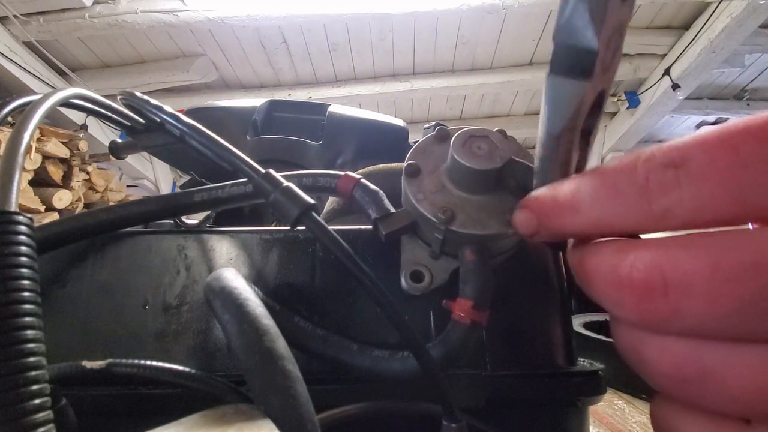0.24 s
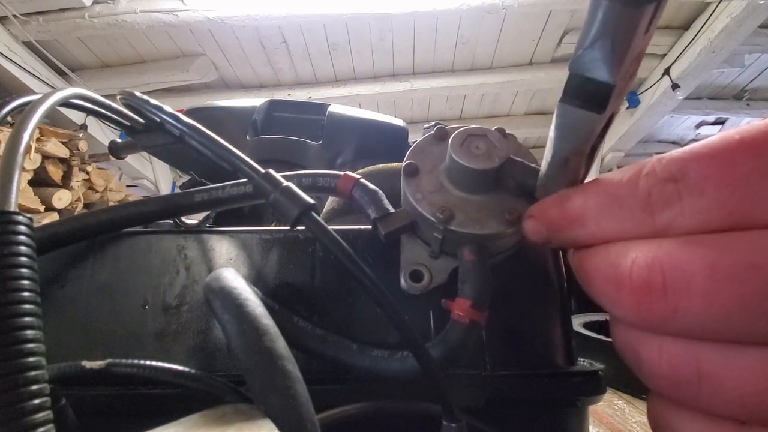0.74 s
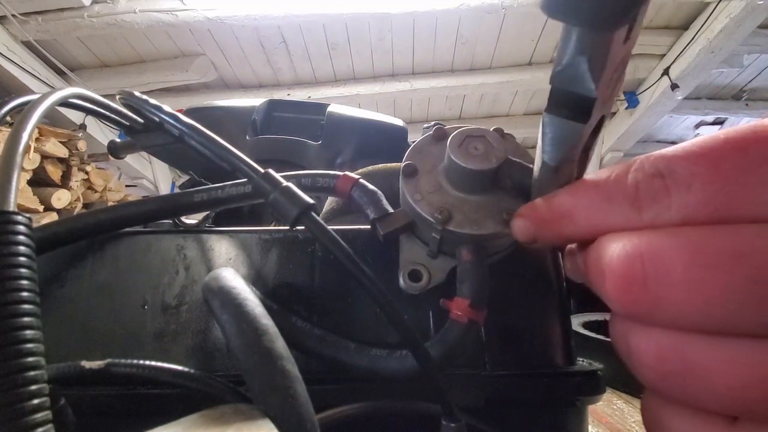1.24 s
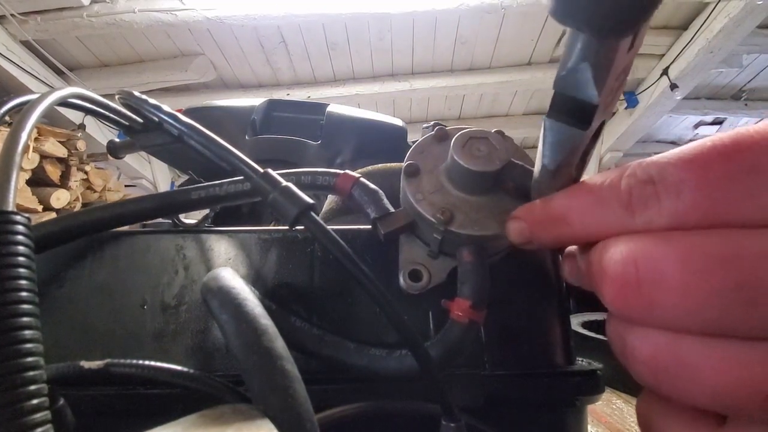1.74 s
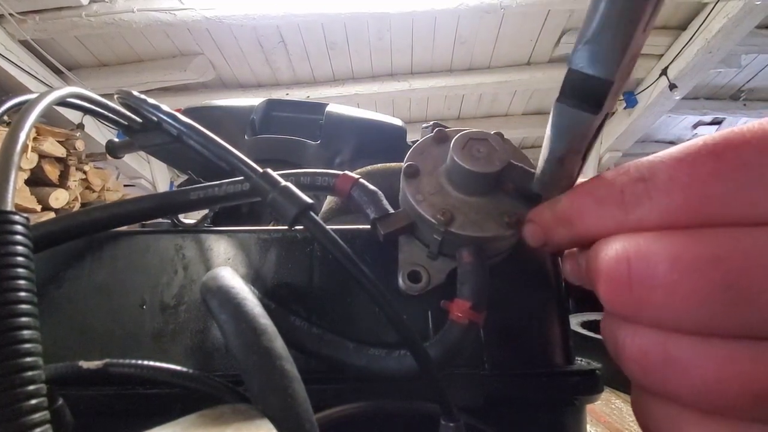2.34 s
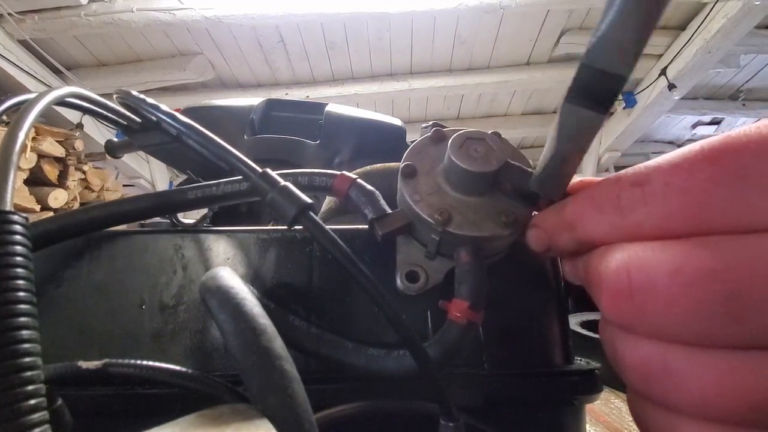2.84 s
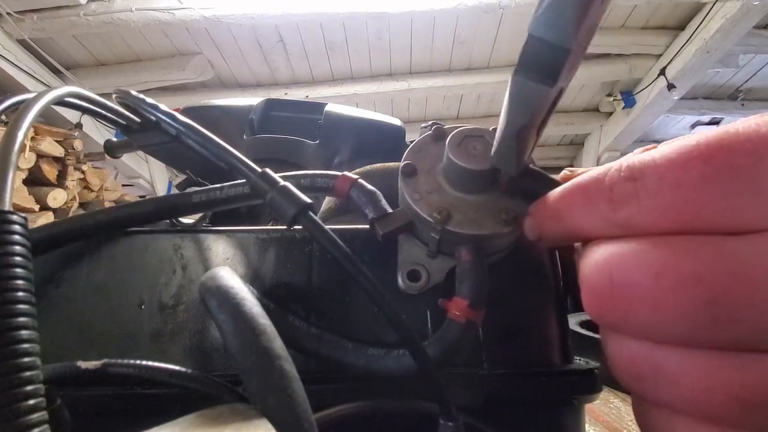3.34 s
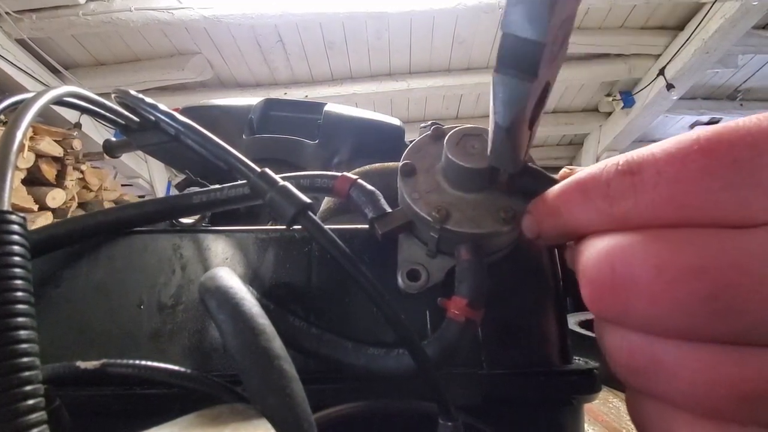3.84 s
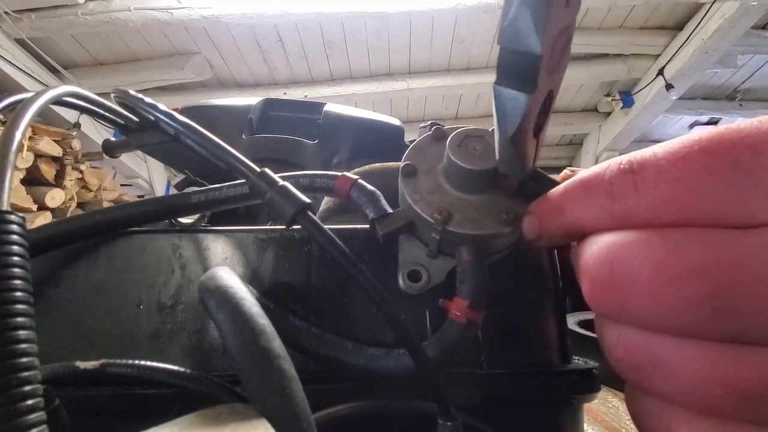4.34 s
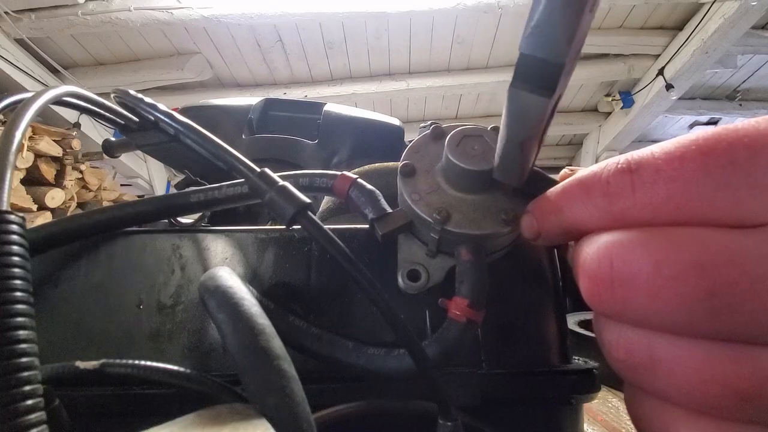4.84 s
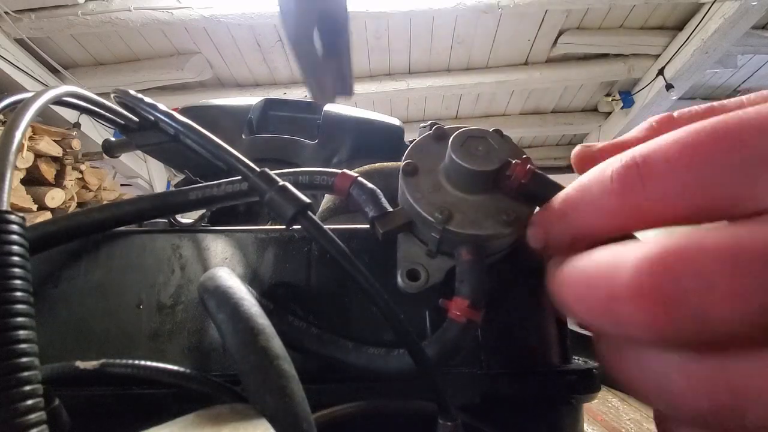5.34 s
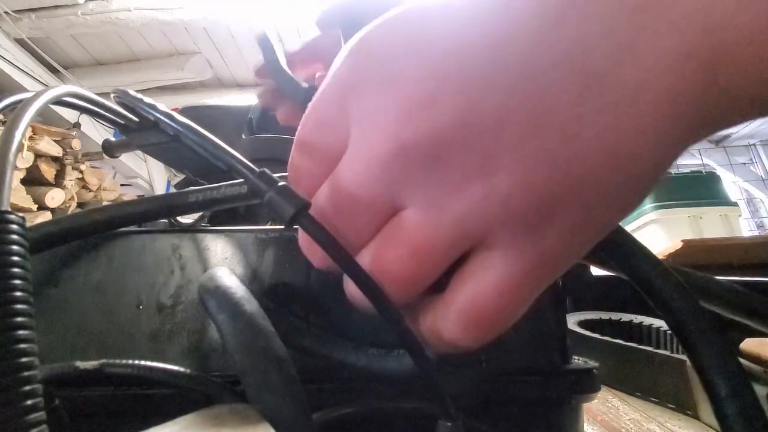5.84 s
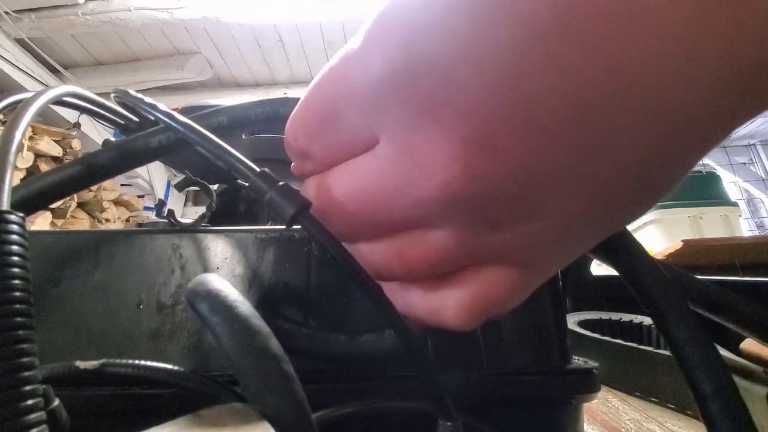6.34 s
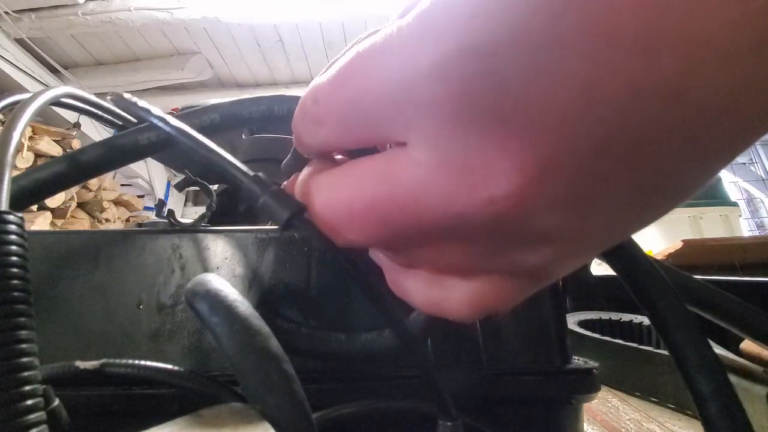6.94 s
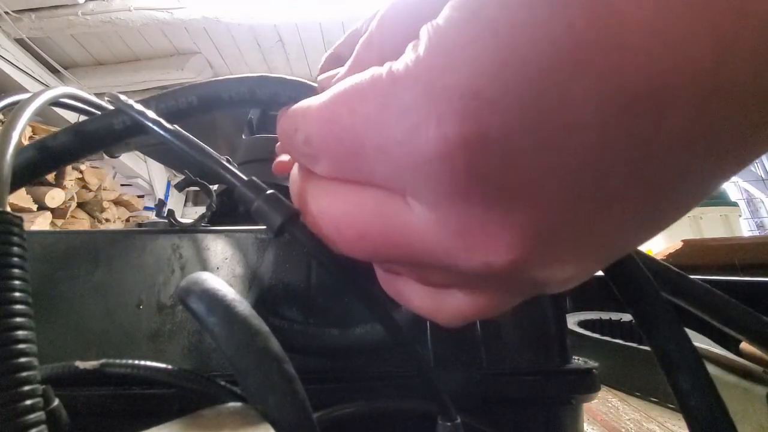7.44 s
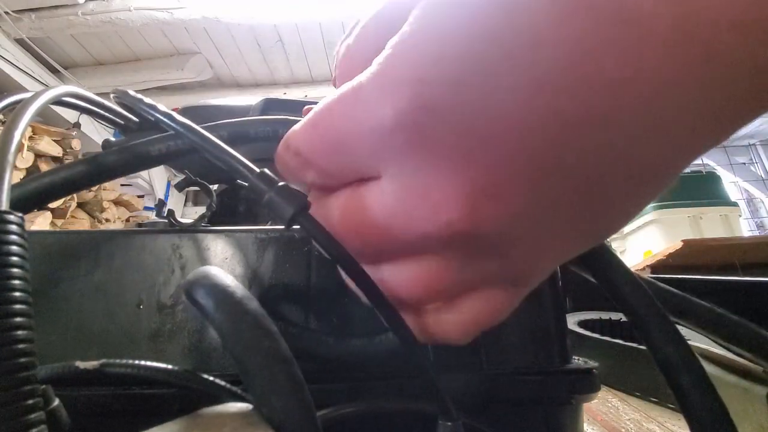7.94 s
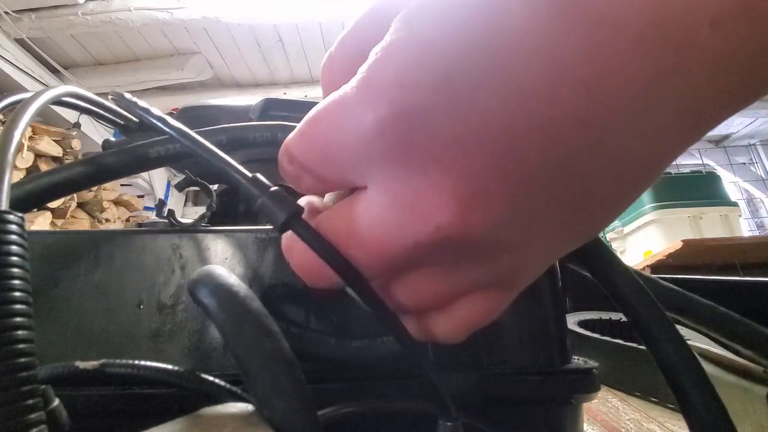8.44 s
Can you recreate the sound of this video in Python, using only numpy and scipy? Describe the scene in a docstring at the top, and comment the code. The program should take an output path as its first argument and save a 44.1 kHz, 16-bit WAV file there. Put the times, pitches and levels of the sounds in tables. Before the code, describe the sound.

Pliers tick, scrape and snap on a hose clamp, with irregular hollow knocks on a metal housing over a soft rumble.

```python
"""A wooden shed, stereo microphone close to a small pump: pliers work a spring clamp along its fuel hose.
Each slip knocks the sheet-metal housing, whose bending waves arrive treble first and then ring. The
steel jaws, a little to the left, tick, scrape, squeak and twice snap off the clamp. Hands rub the hose
and rock the machine, over a soft rumble and faint microphone hiss."""
import sys
import numpy as np
from scipy import signal
from scipy.fft import rfft, irfft, next_fast_len
from scipy.io import wavfile
from scipy.ndimage import uniform_filter1d

SR = 44100
rng = np.random.default_rng(int(sys.argv[2]) if len(sys.argv) > 2 else 0)


def bounce(signal):
    """Save signal as a 16-bit WAV file at the path given by the first command-line argument."""
    frames = np.transpose(np.atleast_2d(signal))
    limited = np.clip(frames, -1, 1)
    pcm = np.round(limited * 32767).astype(np.int16)
    wavfile.write(sys.argv[1], SR, pcm)


N = 383669
SIZE = 16384  # samples in one short sound
T = np.arange(SIZE) / SR
F = np.fft.rfftfreq(SIZE, 1 / SR) + 1  # Hz, kept clear of zero

# Modes of the sheet-metal housing. Each row: pitch in Hz, t60 in seconds, left and right level in dB.
HOUSING_MODES = [(56.01, 0.18, -7, -10.5), (95, 0.082, -5.5, -4), (135, 0.21, -0.5, 1),
                 (181, 0.087, 3.5, 4), (207, 0.055, 3.5, 8), (289, 0.12, 0.5, -3.5),
                 (345.4, 0.2, -3.5, -6.5), (375.4, 0.19, -7, -11.5), (434.7, 0.14, 2.5, -4.5),
                 (501, 0.16, -3.5, -25.5), (534, 0.15, -8.5, -2.5), (587, 0.23, -3, -4.5),
                 (643, 0.16, -5, -7), (705, 0.2, -12, -13), (815, 0.074, 6, -4.5), (926, 0.06, 0, -2.5),
                 (1096, 0.15, -3.5, -13.5), (1265, 0.032, 3, -13), (1345, 0.12, -9.5, -17.5),
                 (1543, 0.11, 0, -4.5)]


def undb(db):
    return 10 ** (np.asarray(db) / 20)


def rms(x):
    return np.sqrt(np.mean(x ** 2))


def add(out, start_s, sound):
    """Mix a sound in at its start time."""
    i = max(0, int(start_s * SR))
    out[..., i:i + sound.shape[-1]] += sound[..., :N - i]


def colour(x, outline):
    """Filter by an outline of (Hz, dB) points."""
    hz, db = np.transpose(outline)
    n = next_fast_len(x.shape[-1], True)
    f = np.fft.rfftfreq(n, 1 / SR) + 1
    gain = undb(np.interp(np.log(f), np.log(hz), db))
    return irfft(rfft(x, n) * gain, n)[..., :x.shape[-1]]


def delay(ms):
    """Spectrum of a plain delay."""
    return np.exp(-2j * np.pi * F * ms / 1000)


def mode_rings():
    """Spectrum of each housing mode ringing down on its own."""
    hz, t60 = np.transpose(HOUSING_MODES)[:2, :, None]
    return rfft(np.sin(2 * np.pi * hz * T) * np.exp(-np.log(1000) * T / t60)) * 1000 / SR


def housing(rings, hardness, wave_hz=590, width_octaves=.7, bend_hz=89, vary_db=3.25, detune=.025):
    """Stereo spectra of the struck sheet: a falling first wave, and the modes built by its reflections."""
    hz, _, left_db, right_db = np.transpose(HOUSING_MODES)
    spot_db = vary_db * rng.standard_normal(len(hz))  # no two blows land on quite the same spot
    weights = (-1) ** np.arange(len(hz)) * undb(np.array([left_db, right_db]) + spot_db)
    shift = np.exp(detune * rng.standard_normal())  # the hand's pressure shifts the modes a little
    ring = np.array([np.interp(F / shift, F, side) for side in weights @ rings])
    bend = np.exp(-2j * np.pi * 2.31 * np.log(1 + F / bend_hz))  # higher bending waves travel faster
    band = np.exp(-(np.log2(F / (wave_hz * hardness)) / width_octaves) ** 2)
    first_wave = undb([[20], [14]]) * band * bend
    arrival = np.array([delay(ms=0), delay(ms=0.4)])
    return first_wave * arrival, ring * delay(ms=3.86) * arrival


def knocks(usual_corner_hz=760, bass_hz=230, crack_s=0.0066, crack_right_db=-6):
    """A soft contact wakes only the low modes; a hard one lifts the first wave and adds a short crack."""
    # Blows on the housing. Each row: start in seconds, relative level in dB, contact corner in Hz,
    # then the gains of bass, first wave and crack in dB.
    blows = [(0.0, -26.5, 1130, -7, 2.5, -16), (0.439, -46, 487, 3, -3, -30), (.535, -50, 690, 6, 1.5, -33),
             (.734, -48, 840, -0.5, 0.5, -41), (0.85, -58.5, 507, 7, 5.5, -41),
             (0.985, -44, 800, 4, 2, -35), (1.1044, -42.5, 862, 6.5, 3.5, -42),
             (1.863, -36, 964, 0, 2, -34.5), (2.314, -38.5, 996, 1, -12.5, -7.5),
             (2.3491, -35.5, 1300, 3.5, 2, -9.5), (2.621, -56.5, 297, 0, 5, -27),
             (2.896, -58, 330, 3.5, -2.5, -46.5), (3.112, -64, 507, -14, -6, -44),
             (3.377, -45.5, 600, 5.5, -4, -35.5), (3.3979, -23.5, 1300, -0.5, 5, -10.5),
             (3.718, -51, 595, 9.5, -0.5, -35.5), (3.982, -65, 260, 1, -6, -45),
             (4.491, -44.5, 798, 4.5, -0.5, -37), (4.882, -41, 772.4, -4, -3, -21),
             (5.228, -23.5, 1137, -2, 3, -22.5), (5.584, -51, 130.3, -9, -3.5, -24.5),
             (5.906, -41.5, 781, 3.5, 2.5, -40), (5.97, -52, 666, 7, -1, -45.5),
             (7.116, -62, 1400, -12, -2, -14), (7.916, -29.5, 842, -2, -1, -18.5)]
    # Colour of the crack. Each row: frequency in Hz, gain in dB.
    crack_colour = [(400, -14), (1000, 5.5), (2000, -0.5), (3500, -8.5), (6500, -19.5), (8000, -26),
                    (15000, -23)]
    out, head = np.zeros((2, N)), int(.035 * SR)
    rings = mode_rings()
    fade = np.minimum(1, np.linspace(10, 0, SIZE))
    for start_s, db, corner_hz, bass_db, wave_db, crack_db in blows:
        first_wave, ring = housing(rings, hardness=(corner_hz / usual_corner_hz) ** 0.25)
        force = undb(bass_db / (1 + (F / bass_hz) ** 4)) / np.sqrt(1 + (F / corner_hz) ** 6)
        thud = irfft((undb(wave_db) * first_wave + ring) * force) * fade
        crack = colour(rng.standard_normal((2, SIZE)), crack_colour) * undb([[0], [crack_right_db]])
        crack *= np.exp(-T / crack_s) + 2 * np.exp(-T / 0.0013)
        knock = thud / rms(thud[:, :head]) + undb(crack_db) * crack / rms(crack[:, :head])
        add(out, start_s, undb(db + 1.5) * knock)
    return out


def shed(x, near_db, near_t60, far_db, far_t60, right_db):
    """Dense reflections from the machine itself, then a faint, duller tail from the boards."""
    near, far = rng.standard_normal((2, 2, SIZE))
    near = near * np.exp(-np.log(1000) * T / near_t60) * (1 - np.exp(-T / 0.00027))
    far = colour(far, [(100, 7), (900, -2), (2500, -6), (14000, -8)])
    far *= np.exp(-np.log(1000) * T / far_t60) * (1 - np.exp(-T / 0.013))
    echo = (undb(near_db) * near / rms(near) + undb(far_db) * far / rms(far)) / np.sqrt(SIZE)
    return x + signal.fftconvolve(x[:1], echo * undb([[0], [right_db]]), axes=1)[:, :N]


def rumble(outline, side_db=-12):
    """Deep noise of a given colour, nearly alike on both sides of the microphone."""
    mid, side = rng.standard_normal((2, N))
    deep = colour(mid + undb(side_db) * side * np.array([[1], [-1]]), outline)
    return deep / rms(deep)


def rocking():
    """The machine rocks under the hand: deep swells that rise and die away."""
    # A hand leans or bumps. Each row: start in seconds, level in dB, attack and decay in seconds.
    nudges = [(0.0, -49, .01, 0.076), (2.318, -39, 0.0063, .035), (2.612, -49, 0.012, 0.057),
              (3.376, -35, 0.0086, 0.044), (5.0, -54, .1, 0.17), (5.585, -42.5, 0.0095, 0.068),
              (6.25, -52.5, .05, 0.19), (6.58, -61, .04, 0.14), (7.0, -61, 0.12, 0.24),
              (8.4, -65, .15, .25)]
    # Colour of the rocking machine. Each row: frequency in Hz, gain in dB.
    thump_colour = [(15, -12), (35, 1), (60, 1), (120, -10.5), (200, -20), (400, -37), (1500, -61)]
    swell = np.zeros(N)
    for start_s, db, attack_s, decay_s in nudges:
        age = np.arange(N) / SR - start_s
        rise = np.clip(age / attack_s, 0, 1)
        swell += undb(db) * rise * np.exp(-np.maximum(age - attack_s, 0) / decay_s)
    return swell * rumble(thump_colour)


def room_tone(rumble_db=-66.5, waver_db=4, wavers_per_s=9, hiss_db=-82):
    """A wavering rumble under smooth microphone hiss."""
    # Colours of the rumble and the hiss. Each row: frequency in Hz, gain in dB.
    rumble_colour = [(15, -20.5), (30, -10.5), (50, -2.5), (80, -2), (130, -9), (200, -18), (350, -23.5),
                     (700, -37), (2000, -50.5)]
    hiss_colour = [(100, 3), (400, -0.5), (1000, 7), (3000, 2), (6000, -5), (8500, -10), (12000, 1.5),
                   (15500, 0.5), (16200, -14)]
    hiss = colour(rng.standard_normal((2, N)), hiss_colour)
    waver = np.interp(np.arange(N) / SR * wavers_per_s, np.arange(512), rng.standard_normal(512))
    return undb(rumble_db + waver_db * waver) * rumble(rumble_colour) + undb(hiss_db) * hiss / rms(hiss)


def resonate(force, modes, tilt_db, right_db):
    """A contact force heard through resonances, tilted above 1 kHz, left of the microphone."""
    body = sum((-1) ** k * undb(db) / (1 + 1j * (F ** 2 - hz ** 2) / (F * width))
               for k, (hz, width, db) in enumerate(modes))
    tilt = undb(tilt_db * np.log2(np.clip(F, 1000, None) / 5000))
    arrival = np.array([delay(ms=0), undb(right_db) * delay(ms=0.029)])
    return irfft(rfft(force) * body * tilt * arrival)


def rubs(slips_per_s=1800, scatter_db=4.0, soft_hz=1200, uneven_db=3):
    """Sliding is a swell of uneven micro-slips, heard as a hollow scrape and a low housing drone."""
    # Jaws and fingers sliding on hose and clamp. Each row: start and length in seconds,
    # scrape level in dB, tilt in dB per octave, housing level in dB.
    slides = [(0.158, 0.054, -75, 0, -98.5), (0.379, 0.025, -67, -1, -65), (2.602, 0.051, -68, -1, -68),
              (4.114, 0.041, -73, -6.5, -67), (4.402, 0.041, -80.5, 0, -80.5), (5.011, 0.34, -77, 1, -71),
              (5.564, 0.043, -80, 5.5, -74), (6.607, 0.068, -73, 4.5, -75.5),
              (6.924, 0.091, -81.5, 1.5, -76.5), (7.419, 0.094, -69.5, 1.5, -83),
              (7.529, 0.053, -70.5, 9.5, -86), (7.6, 0.1, -82.5, 1.5, -90), (7.703, 0.051, -70, 6.5, -91),
              (7.78, 0.056, -76.5, 2.5, -92), (7.843, 0.029, -71, 2.5, -89), (8.497, 0.059, -82, 7, -89)]
    # Hollow colour of the microphone, heard in the rubbing. Each row: centre and width in Hz, gain in dB.
    mic_colour = [(1015, 420, 2), (2600, 260, 3.5), (3950, 400, 3), (5500, 1200, -8), (6600, 300, 0),
                  (13400, 3700, -8.5)]
    out, sheet = np.zeros((2, N)), sum(housing(mode_rings(), hardness=0.93))
    for start_s, length_s, db, tilt_db, housing_db in slides:
        slips = (rng.random(SIZE) < slips_per_s / SR) * rng.choice([-1, 1], SIZE)
        sizes = undb(scatter_db * rng.exponential(size=SIZE))
        grip = undb(uneven_db * np.interp(T, np.linspace(0, T[-1], 24), rng.standard_normal(24)))
        swell = np.sqrt(np.abs(np.sin(np.pi * np.minimum(T / length_s, 1))))
        force = slips * sizes * grip * swell
        scrape = resonate(force, mic_colour, tilt_db, right_db=-5)
        drone = irfft(rfft(force) * sheet / (1 + (F / soft_hz) ** 2))
        n = int(length_s * SR)
        add(out, start_s, undb(db) * scrape / rms(scrape[:, :n]))
        add(out, start_s, undb(housing_db) * drone / rms(drone[:, :n]))
    return out


def ticks(machine_db=-22.0, machine_s=0.015, boards_db=-51, boards_s=0.058):
    """Steel slips off steel: a burst of tiny impacts, scattered by the machine and faintly by the boards."""
    # Jaws ticking on the clamp. Each row: start in seconds, relative level in dB,
    # tilt in dB per octave, decay in milliseconds.
    contacts = [(0.371, -63.5, -6.5, 6.5), (0.411, -57.5, -6, 3.5), (0.419, -61, -6, 0.45),
                (.453, -60, -8, 3.1), (.503, -69, -13, 1.4), (0.571, -65, -15, 1.4), (.581, -66, -17, 1.7),
                (0.595, -70.5, -3, 0.62), (0.6803, -68, -5, 0.52), (0.8478, -35.5, -2.5, 0.92),
                (1.411, -68.5, -9, 3.6), (1.702, -59, 1.5, 1.1), (1.781, -67.5, -5, 1.1),
                (2.3124, -24, 7, 1.2), (2.3146, -21.5, 10, 0.6), (2.3486, -20, 5.5, 0.91),
                (2.379, -45.5, 19, 1), (3.368, -58, -6, 25), (3.4, -36.5, 5, 0.93),
                (3.4105, -48.5, -10, 0.87), (3.436, -56.5, 5.5, 1), (4.447, -73.5, -2.5, 1.6),
                (4.873, -56, -12.5, 2), (4.88, -41, -5.5, 1.1), (4.901, -48, -5.5, 1.1),
                (5.0723, -47.5, -5.5, 2), (5.169, -50.5, 3, 3.4), (5.1895, -57, 13, 0.94),
                (5.231, -46, -5.5, 2), (5.509, -65.5, 8, 1.5), (6.304, -69.5, -0.5, 1),
                (6.6148, -54.5, 11, 1), (6.922, -72, -11, 1.9), (7.7757, -62, 19, 1.5),
                (7.9143, -54.5, -10, 2.1)]
    # Resonances of pliers and clamp. Each row: centre and width in Hz, gain in dB.
    steel_modes = [(990, 250, -13.5), (2650, 400, 0), (3850, 700, 1), (5400, 1900, -1), (6758, 260, 5.5),
                   (8610, 890, -19), (12400, 3100, -7.5)]
    out, head = np.zeros((2, N)), int(.004 * SR)
    echo_decay = undb(machine_db) * np.exp(-T / machine_s) + undb(boards_db) * np.exp(-T / boards_s)
    fade = np.minimum(1, np.linspace(2, 0, SIZE))
    for start_s, db, tilt_db, decay_ms in contacts:
        burst = rng.standard_normal(SIZE) * np.exp(-1000 * T / decay_ms)
        echo = np.sqrt(decay_ms) * echo_decay * rng.standard_normal((2, SIZE))
        tick = resonate(burst + echo, steel_modes, tilt_db, right_db=-9) * fade
        add(out, start_s, undb(db + 1) * tick / rms(tick[:, :head]))
    return out


def squeaks(roughness=0.07, right_db=-5):
    """Stick-slip locks briefly onto one unsteady pitch."""
    # The gripping jaws. Each row: start in seconds, pitch in Hz, relative level in dB, decay in ms.
    grips = [(0.452, 3130, -57.5, 4.1), (0.57, 2910, -69, 11), (1.302, 3510, -69, 8),
             (1.41, 2870, -73, 9.7), (2.612, 4355, -59, 11.6), (5.527, 6840, -70.5, 5.25)]
    out = np.zeros((2, N))
    for start_s, hz, db, decay_ms in grips:
        wobble = uniform_filter1d(rng.standard_normal(SIZE), size=50)
        pitch_hz = hz * (1 + roughness * wobble / rms(wobble))
        tone = np.sin(2 * np.pi * np.cumsum(pitch_hz) / SR)
        swell = np.exp(-1000 * T / decay_ms) * (1 - np.exp(-1000 * T))
        add(out, start_s, 2 * undb([[db], [db + right_db]]) * tone * swell)
    return out


def scene():
    """Housing and tool at close range in the same small shed."""
    knocking = shed(knocks(), near_db=-8.5, near_t60=0.13, far_db=-28.5, far_t60=0.39, right_db=-3.5)
    sliding = shed(rubs() + squeaks(),
                   near_db=-1, near_t60=0.17, far_db=-22.0, far_t60=0.45, right_db=-12.5)
    return knocking + sliding + ticks() + rocking() + room_tone()


def record(dry):
    """The recorder drops the deepest rumble and cuts the top."""
    low_cut = signal.butter(2, 22, "high", fs=SR, output="sos")
    high_cut = signal.ellip(8, .2, 70, 16000, fs=SR, output="sos")
    return signal.sosfilt(high_cut, signal.sosfilt(low_cut, dry))


dry = scene()
out = record(dry)
bounce(out)
```